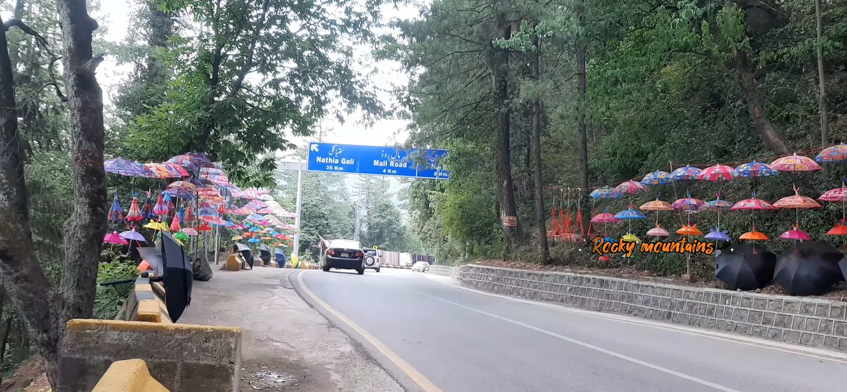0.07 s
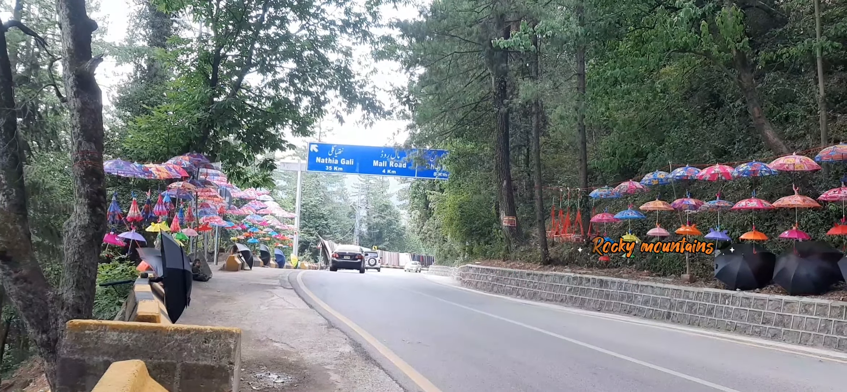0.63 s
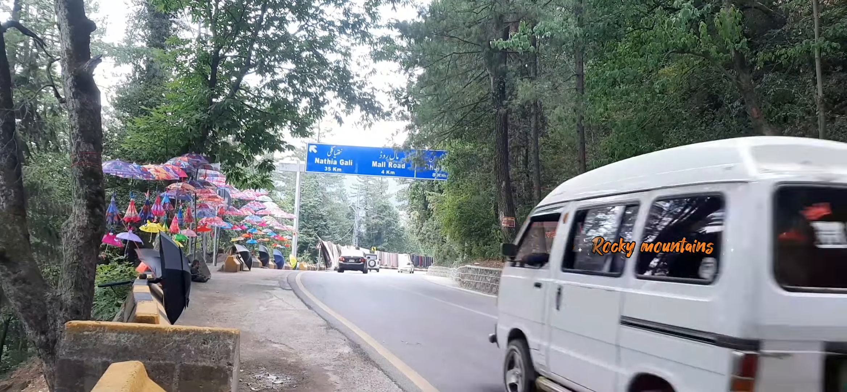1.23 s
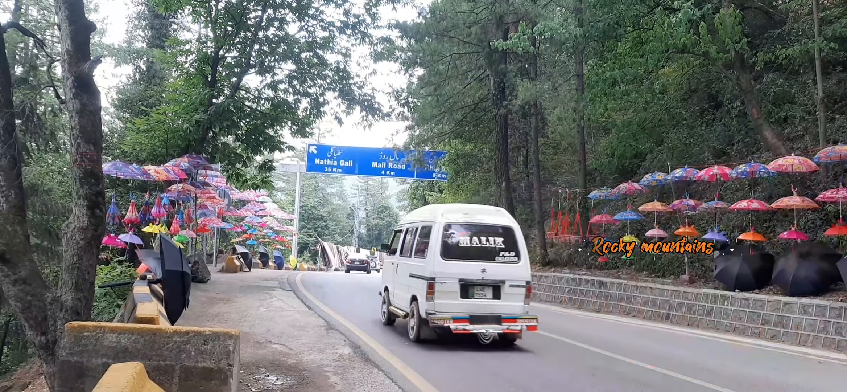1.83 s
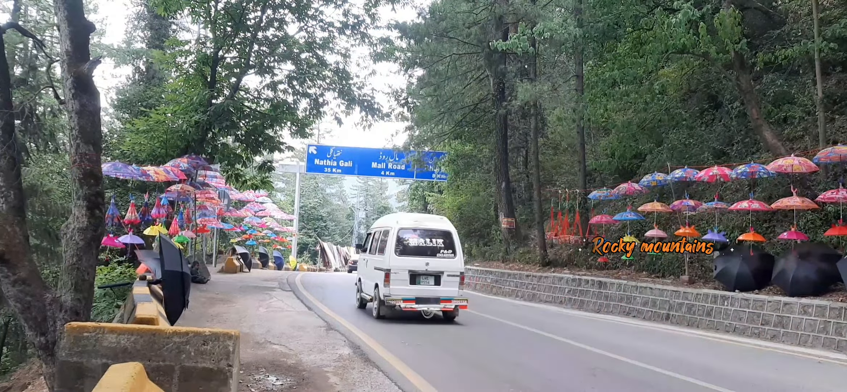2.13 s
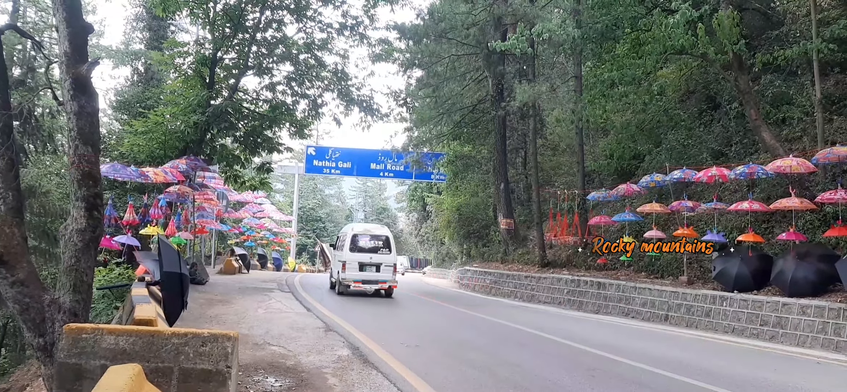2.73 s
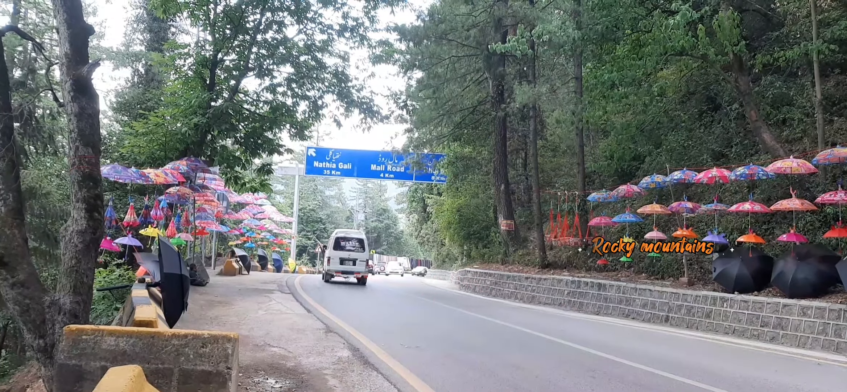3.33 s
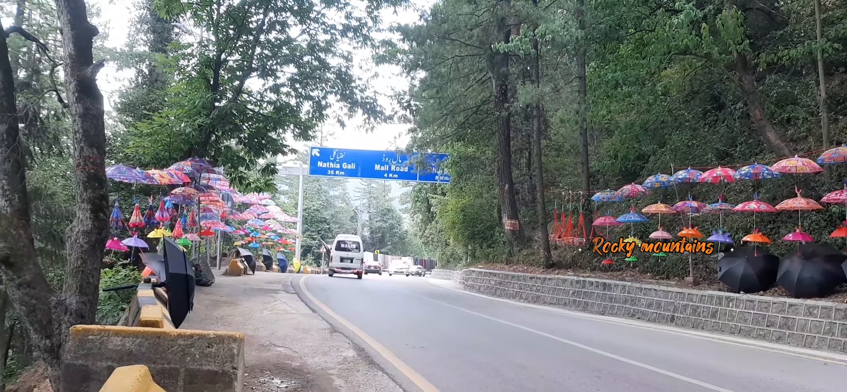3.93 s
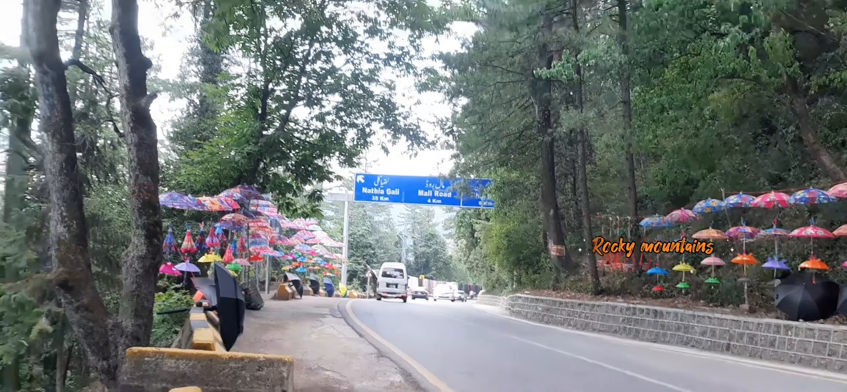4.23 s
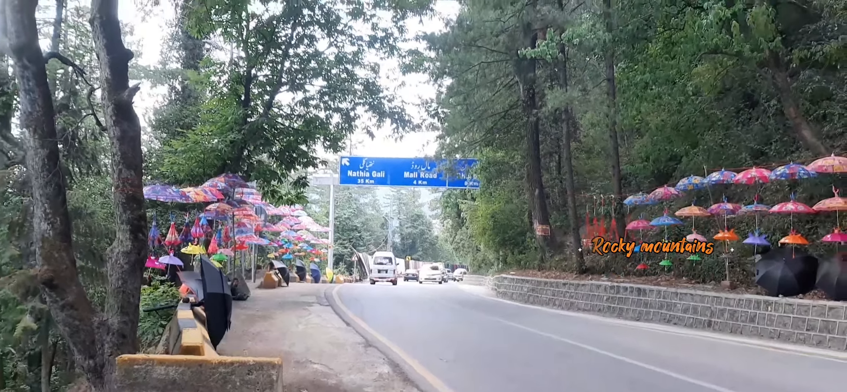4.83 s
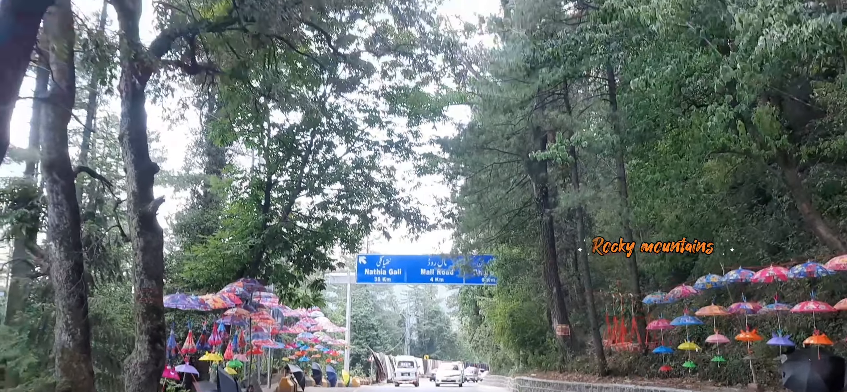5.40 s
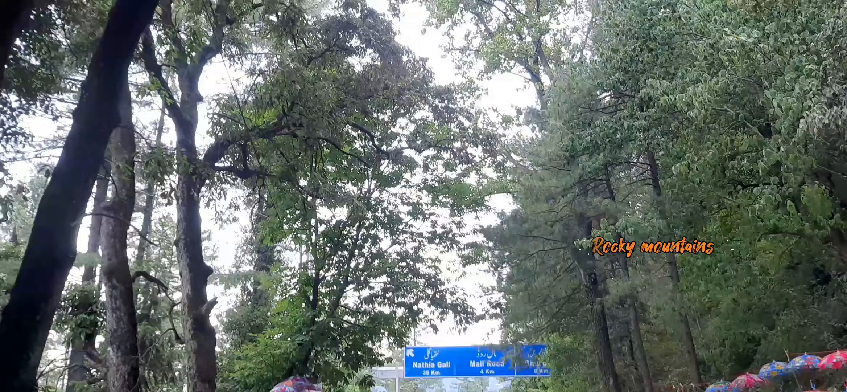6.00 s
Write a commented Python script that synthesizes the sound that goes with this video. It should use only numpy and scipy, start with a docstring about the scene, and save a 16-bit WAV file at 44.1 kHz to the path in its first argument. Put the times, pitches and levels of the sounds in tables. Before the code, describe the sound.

Tyre rush and a humming engine swell quickly as a van drives past a few metres from the microphone, heard a little more on the left. The hiss dies away first, while the low exhaust drone lingers as the van recedes. Far-off traffic murmurs steadily among the trees, birds give short, quiet calls, and there is one brief rustle of handling late on.

```python
"""Van passing on a forest road

A small van drives by about three metres from a camera's stereo microphone and pulls away uphill,
slowly gaining revs. Its exhaust hums, its engine clatters once per firing and its tyres rush.
Traffic murmurs far up the road, birds call in the trees, and a hand rustles briefly on the camera."""
import sys
import numpy as np
from scipy import signal
from scipy.fft import rfft, irfft, next_fast_len
from scipy.io import wavfile
from scipy.ndimage import uniform_filter1d, map_coordinates

SR = 44100
rng = np.random.default_rng(int(sys.argv[2]) if len(sys.argv) > 2 else 0)


def dump(signal):
    """Clip the signal to [-1, 1] and save it as 16-bit WAV at the path in sys.argv[1]."""
    limited = np.clip(np.atleast_2d(signal).T, -1, 1)
    pcm = np.round(limited * 32767).astype(np.int16)
    wavfile.write(sys.argv[1], SR, pcm)


N = 267334
TIME_S = np.arange(N) / SR


def amp(db):
    """Decibels to gain."""
    return 10 ** (np.asarray(db) / 20)


def unit(x):
    """Scale to rms 1."""
    return x / np.sqrt(np.mean(x ** 2) + 1e-20)


def along(points, hz):
    """Read (frequency, value) points at hz, on a log axis."""
    knots_hz, values = np.transpose(points)
    return np.interp(np.log(hz + 1), np.log(knots_hz + 1), values)


def curves(rows):
    """One value per sample for each column after the time."""
    knots_s, *columns = np.transpose(rows)
    return [np.interp(TIME_S, knots_s, column) for column in columns]


def wobble(rate):
    """A smooth random curve, rate knots a second."""
    return map_coordinates(rng.standard_normal(int(N * rate / SR) + 4), [TIME_S * rate])


def step(middle_s, length_s):
    """A smooth rise from 0 to 1."""
    return (1 + np.tanh((TIME_S - middle_s) / length_s / 2)) / 2


def bell(middle_s, half_length_s):
    """A smooth swell from 0 to 1 and back."""
    return np.exp(-((TIME_S - middle_s) / half_length_s) ** 2)


def filtered(x, response):
    """Filter x by a gain given as a function of frequency."""
    size = next_fast_len(N + 8192)
    return irfft(rfft(x, size) * response(np.fft.rfftfreq(size, 1 / SR)), size)[..., :N]


# Balance of the microphone's two ports: frequency_hz, left_minus_right_db
PORT_BALANCE = [(60, 4.5), (160, 3), (300, -1), (450, 3.5), (950, 3), (1400, 6), (1850, 10), (2150, 5),
                (2450, 10.5), (3200, 0), (3800, 9), (4700, 0.5), (6200, 5), (12000, 2)]
# Phase between the ports: frequency_hz, left_lag_rad
PORT_LAG = [(40, .75), (120, 0.62), (200, 0.36), (300, 0.15), (400, 0.17)]

def ports(hz):
    """Left and right response of the microphone, with mean 1."""
    ratio = amp(along(PORT_BALANCE, hz)) * np.exp(-1j * along(PORT_LAG, hz))
    return 2 * np.array([ratio, np.ones_like(ratio)]) / (1 + ratio)


# How alike noise is at the two ports: frequency_hz, correlation
PORT_LIKENESS = [(60, 0.8), (300, 0.8), (420, 0.86), (640, 0.67), (1000, 0.5), (1350, 0.37), (1900, -.5),
                 (2500, 0.18), (15000, 0)]

def rush(spectrum, patchy_db):
    """Stereo noise shaped by a spectrum, with patches of random gain; its mid has rms 1."""
    cells = signal.stft(rng.standard_normal((2, N)), nperseg=512)[2]
    patches = uniform_filter1d(rng.standard_normal(cells.shape[1:]), 5, axis=0)
    patches = unit(uniform_filter1d(patches, 16, axis=1))
    pair = signal.istft(cells * amp(patchy_db * patches), nperseg=512)[1][:, :N]
    size = next_fast_len(N + 8192)
    hz = np.fft.rfftfreq(size, 1 / SR)
    mid, side = rfft(pair, size) * amp(along(spectrum, hz))
    likeness = np.clip(along(PORT_LIKENESS, hz), -.8, 1)
    width = np.tan(np.arccos(likeness) / 2)  # unlike ports give more side
    gain = ports(hz)
    gain = gain / np.hypot(1, width * np.abs(gain[0] - 1))
    stereo = irfft(gain * np.array([mid + width * side, mid - width * side]), size)[:, :N]
    return stereo / stereo.mean(0).std()


# Colour of the traffic far up the road: frequency_hz, density_db
TRAFFIC_SPECTRUM = [(30, -40), (60, -12), (100, 7), (150, -3.5), (200, -6), (375, 0), (440, -9.5),
                    (520, -8.5), (660, -11.5), (880, -12.5), (1100, -14.5), (1300, -12.5), (3000, -22.5),
                    (4100, -19.5), (7400, -34.5), (8500, -55.5)]
# Its level at the microphone: time_s, level_db
TRAFFIC_LEVEL = [(0, -51.5), (3.9, -52), (4.5, -51.5), (5.3, -51), (6.06, -54.5)]

def traffic():
    """Distant cars merge into a nearly steady murmur."""
    level_db = curves(TRAFFIC_LEVEL)[0] + 0.13 * wobble(2.8)
    return amp(level_db) * rush(TRAFFIC_SPECTRUM, patchy_db=1.0)


# Notes from the trees: start_s, length_s, start_hz, end_hz, level_db, overtone_db, hoarseness (0-1)
BIRD_NOTES = [(2.668, 0.037, 3158, 3105, -58, -14, 0.13), (2.735, 0.054, 2580, 2693, -49.5, -8, 0.17),
              (2.888, 0.038, 3900, 3600, -61, -22, 0.09), (2.943, 0.046, 3460, 3170, -64, -20, .1),
              (3.065, .055, 3000, 3430, -51.5, -7.5, 0.81), (3.154, .05, 2550, 2796, -50.5, -7, .8),
              (3.297, 0.061, 2470, 2620, -53, -9.5, 0.3), (3.461, 0.052, 2693, 2405, -50.5, -10.5, 0.31),
              (4.121, .06, 4200, 4310, -61.5, -25, .16), (4.422, .04, 4360, 4214, -60.5, -27, .17),
              (4.607, .05, 4700, 4800, -61.5, -39, 0.14), (5.007, .055, 3835, 3648, -59, -18, 0.2),
              (5.056, 0.047, 3698, 3210, -54, -11, 0.1)]

def birds(rasp_hz, buzz_hz, ragged):
    """Short gliding notes; a fast, ragged buzz splits hoarse ones into side lines."""
    song = np.zeros(N)
    for start_s, length_s, start_hz, end_hz, level_db, overtone_db, hoarseness in BIRD_NOTES:
        on = (TIME_S > start_s) & (TIME_S < start_s + length_s)
        progress = (TIME_S[on] - start_s) / length_s
        jitter = unit(uniform_filter1d(rng.standard_normal(len(progress)), size=40))
        buzz = np.sin(2 * np.pi * buzz_hz * TIME_S[on]) + ragged * jitter
        pitch_hz = start_hz + (end_hz - start_hz) * progress + rasp_hz * hoarseness * buzz
        phase = 2 * np.pi * np.cumsum(pitch_hz) / SR
        envelope = amp(level_db) * np.sqrt(2 * np.abs(np.sin(np.pi * progress)))
        song[on] += envelope * (np.sin(phase) + amp(overtone_db) * np.sin(2 * phase))
    return filtered(song, lambda hz: 1 / (1 + (hz / 7000) ** 16))  # distance dulls the top


# Reverberation of the forest around the microphone: frequency_hz, t60_s
FOREST_DECAY = [(200, 0.61), (3000, 0.91), (10000, 0.75)]

def forest(x):
    """Trunks scatter a sound into a soft tail, different at each port."""
    hz, age_s, cells = signal.stft(rng.standard_normal((2, SR // 2)), SR, nperseg=256)
    decay = amp(-60 * age_s / along(FOREST_DECAY, hz)[:, None])
    tail = signal.istft(cells * decay, SR, nperseg=256)[1]
    return signal.fftconvolve(x[None], tail / np.linalg.norm(tail[0]), axes=1)[:, :N]


# Rubs on the case, right at the microphone: middle_s, level_db, half_length_s
HAND_RUBS = [(4.155, -57.5, .035), (4.206, -51, .015), (4.242, -50.5, 0.016), (4.3, -54, .012),
             (4.326, -53.5, .014), (4.35, -56, .012), (4.41, -58.5, 0.038), (4.472, -57, .007)]
# Colour of the rubbing skin: frequency_hz, density_db
SKIN_SPECTRUM = [(200, -15.5), (500, -1), (1200, 4), (2400, 2), (3100, -4.5), (4100, 2.5), (5200, -6.5),
                 (7000, -5.5), (8700, -25), (13000, -16.5), (15800, -16.5)]

def hand(grain_db, bump_db, bump_hz):
    """Skin slips over the camera's case in short grainy rubs, with one soft bump of the grip."""
    power = sum(amp(level_db) ** 2 / (1 + ((TIME_S - middle_s) / half_length_s) ** 2) ** 2
                for middle_s, level_db, half_length_s in HAND_RUBS)
    grain = unit(amp(grain_db * wobble(700)))
    bump = amp(bump_db) * bell(4.32, 0.056) * np.sin(2 * np.pi * bump_hz * TIME_S)
    return np.sqrt(power) * grain * rush(SKIN_SPECTRUM, patchy_db=2.1) + bump


SPEED_M_PER_S, CLOSEST_M = 6.42, 2.93  # the van's straight path past the microphone
TAIL_TURN_S, TAIL_RISE_S = 0.92, 0.08  # when and how fast its tail comes to face the microphone

def passing(abreast_s, db, ahead_db, behind_db):
    """Level of a part of the van, losing ahead_db or behind_db with each doubling of distance."""
    road_m = SPEED_M_PER_S * (TIME_S - abreast_s)
    doublings = np.log2(np.hypot(1, road_m / CLOSEST_M))
    sag_db = 2.5 * bell(2.22, 0.44)  # the level dips briefly as the van draws away
    return db - np.where(road_m < 0, ahead_db, behind_db) * doublings - sag_db


# Engine speed as heard from the roadside, Doppler drop included: time_s, firing_hz
FIRING_RATE = [(0, 57.67), (.2, 58.48), (.75, 58.41), (1.05, 57.43), (1.35, 56.94), (1.65, 57.47),
               (2.8, 59.5), (3.2, 59.59), (4.45, 60.48), (6.06, 62.55)]

def crank(jitter):
    """Count of the engine's firings so far, with a slight unsteadiness."""
    return np.cumsum(curves(FIRING_RATE)[0]) / SR + jitter * wobble(22)


def order(firings, multiple, db, flutter_db):
    """One line of the exhaust note, at a multiple of the firing rate, as both ports hear it."""
    line = np.exp(2j * np.pi * (multiple * firings + rng.random()))
    mean_hz = multiple * np.mean(FIRING_RATE, axis=0)[1:]
    return np.sqrt(2) * amp(db + flutter_db * wobble(16)) * (ports(mean_hz) * line).real


def bursts(firings, depth, sharp, scatter_db):
    """A gain of rms about 1 that peaks at each firing, each with its own strength; depth is 0-1."""
    strengths = amp(scatter_db * rng.uniform(-np.sqrt(3), np.sqrt(3), 1000))
    nearest = np.floor(firings + .5).astype(int) % 1000
    peaks = unit(strengths[nearest] * np.exp(sharp * (np.cos(2 * np.pi * firings) - 1)))
    return np.sqrt(1 - depth + depth * peaks ** 2)


# Narrow hisses while the van is near the microphone:
# middle_s, half_length_s, pitch_hz, width_hz, level_db, left_minus_right_db
HISS_FLARES = [(.3, 0.66, 3910, 903, -50.5, 14.5), (.58, 0.073, 6350, 904, -44, 12.5),
               (.81, 0.13, 3910, 1201, -40.3, 13), (.84, .13, 1904, 450.4, -44, 15),
               (1.05, 0.044, 6250, 696, -49, 3), (1.22, 0.21, 3330, 700, -51, 7),
               (1.312, 0.087, 5950, 649.5, -48, 3), (1.65, .1, 3510, 702, -52, -1),
               (1.777, 0.18, 5334, 796.3, -50.5, 1)]

def flares(firings, sink_per_s):
    """Fuzzy lines of hiss that swell, pulse with the engine and sink in pitch."""
    hiss = np.zeros((2, N))
    for middle_s, half_length_s, pitch_hz, width_hz, level_db, left_db in HISS_FLARES:
        phase = 2 * np.pi * np.cumsum(pitch_hz * np.exp(-sink_per_s * (TIME_S - middle_s))) / SR
        band = np.array([wobble(width_hz) * np.cos(phase) + wobble(width_hz) * np.sin(phase)
                         for _ in range(2)])
        pan = amp([[left_db / 2], [-left_db / 2]])
        hiss += amp(level_db) * pan * bell(middle_s, half_length_s) * band
    return hiss * bursts(firings, depth=0.6, sharp=1.2, scatter_db=3.5)


# The van's rush with its nose to the microphone: frequency_hz, density_db
FRONT_SPECTRUM = [(260, -14.5), (450, -1.5), (577, -5), (681, -4.5), (937, -8), (1380, -6), (1610, -8),
                  (1880, -6.5), (2170, -10.5), (2440, -8.5), (3090, -16.5), (3830, -11), (5460, -17),
                  (6360, -16.5), (7600, -25), (9880, -66), (16700, -120)]
# The rush heard from behind: frequency_hz, density_db
TAIL_SPECTRUM = [(260, -38), (450, 1), (495, -18.5), (705, -7.5), (852, -16.5), (1100, -14), (1380, -7.5),
                 (1560, -14), (1950, -11), (2140, -16.5), (2380, -8.5), (3020, -17.5), (3440, -14),
                 (4110, -16), (6000, -14), (7600, -23), (9880, -76), (16700, -120)]
# The highest hiss, which carries only a short way: frequency_hz, density_db
HISS_SPECTRUM = [(6000, -44.5), (8500, -8.5), (10000, -4), (12500, -1.5), (15800, -5.5)]
# Its rise and fall at the roadside: time_s, relative_level_db
HISS_LEVEL = [(0, -72), (.26, -67), (.63, -53.5), (.75, -57), (.97, -57), (1.3, -63), (1.75, -69.5),
              (2.15, -78), (2.8, -82.5), (3.9, -93.5)]

def tyres_and_clatter(firings, clatter_depth):
    """Tyres roar smoothly, changing colour as the van goes by; above them each firing ticks."""
    behind = step(TAIL_TURN_S, TAIL_RISE_S)
    front = rush(FRONT_SPECTRUM, patchy_db=1.85)
    tail = amp(-3.5) * rush(TAIL_SPECTRUM, patchy_db=1.7)
    level_db = passing(abreast_s=0.9226, db=-34.5, ahead_db=7, behind_db=9.5)
    body = amp(level_db) * (np.sqrt(1 - behind) * front + np.sqrt(behind) * tail)
    hiss = amp(curves(HISS_LEVEL)[0] + 1.7) * rush(HISS_SPECTRUM, patchy_db=2.4)
    roar = filtered(body, lambda hz: 1 / (1 + (hz / 1900) ** 4))
    depth = clatter_depth * step(0.44, .06)  # the clatter comes out as the cab draws level
    return roar + (body - roar + hiss) * bursts(firings, depth, sharp=1.0, scatter_db=3.5)


def throb_db(rate_hz, crest_s, depth):
    """Round crests and sharp dips, as of two close tones beating."""
    phase = 2 * np.pi * rate_hz * (TIME_S - crest_s) + 0.23 * wobble(3)
    return 20 * np.log10(np.abs(1 + depth * np.exp(1j * phase)))


# The exhaust's drone at the roadside: time_s, second_order_relative_db, third_order_relative_db
DRONE_LEVELS = [(0.0, -37, -39), (0.1, -33.5, -42), (0.37, -31, -36), (0.64, -33.5, -48),
                (0.76, -36.5, -37), (0.86, -32.5, -42), (0.99, -28.5, -34.5), (1.43, -29.5, -49),
                (1.67, -31, -40), (2.41, -39, -49.5), (2.65, -37, -44), (3.11, -40.5, -45.5),
                (3.39, -39, -40), (3.66, -38.5, -49.5), (4.15, -41, -44), (4.91, -42, -50),
                (5.67, -42, -48.5), (6.06, -52, -53)]
# Weaker orders against the engine's level, from either end of the van: multiple, front_db, behind_db
UPPER_ORDERS = [(6, -0.5, -4.5), (7, -5, -11.5), (8, -26, -9.5), (9, -8.5, -21), (11, -14, -18),
                (12, -20, -17.5)]
# Lines that unequal cylinders add between the orders, against the tailpipe up close: multiple, level_db
UNEVEN_LINES = [(5 / 3, -10), (10 / 3, -6), (17 / 3, -13.5)]

def exhaust(firings):
    """Firing pulses make clean low orders, wavering upper ones and a puffing rumble."""
    second_db, third_db = curves(DRONE_LEVELS)
    engine_db = passing(abreast_s=0.95, db=-40.5, ahead_db=4.5, behind_db=6.5)
    engine_db += 3.5 * bell(3.8, .75)  # swells as the van pulls uphill
    pipe_db = passing(abreast_s=1.5, db=-39.5, ahead_db=6.5, behind_db=6.5)
    fourth_db = passing(abreast_s=1.0, db=-42, ahead_db=11, behind_db=8)
    fifth_db = passing(abreast_s=1.38, db=-44, ahead_db=3.5, behind_db=4)
    hum = order(firings, 1, pipe_db - .7, flutter_db=.8)
    hum += order(firings, 2, second_db - .3, flutter_db=.6)
    hum += order(firings, 3, third_db - .7, flutter_db=0.97)
    hum += order(firings, 4, fourth_db, flutter_db=2.1)
    hum += order(firings, 5, fifth_db + throb_db(rate_hz=3.21, crest_s=4.08, depth=0.68), flutter_db=0.7)
    behind = step(TAIL_TURN_S, TAIL_RISE_S)
    upper = sum(order(firings, multiple, engine_db + front + (back - front) * behind, flutter_db=2.0)
                for multiple, front, back in UPPER_ORDERS)
    near_db = pipe_db + .7 * (pipe_db - pipe_db.max())  # fades with distance faster than the tailpipe
    uneven = sum(order(firings, multiple, near_db + db, flutter_db=3.0) for multiple, db in UNEVEN_LINES)
    puffs = bursts(firings, depth=.5, sharp=1.3, scatter_db=1.5)
    return hum + upper + uneven + rumble(engine_db + 3.5) * puffs


# Colour of the engine's rumble from the roadside: frequency_hz, density_db
RUMBLE_SPECTRUM = [(25, -41.5), (45, -19.5), (90, 4.5), (150, 1), (215, 2), (330, 0.5), (450, -12),
                   (520, -14.5), (650, -10.5), (900, -27.5), (2000, -66.5)]

def rumble(level_db):
    """The engine's low noise beneath the exhaust note."""
    return amp(level_db) * rush(RUMBLE_SPECTRUM, patchy_db=1.3)


def scene():
    """From the roadside: the van close by, the far road, birds a little to the left, and the hand."""
    firings = crank(jitter=0.0075)
    van = exhaust(firings) + tyres_and_clatter(firings, clatter_depth=0.27)
    van += flares(firings, sink_per_s=.13)
    song = birds(rasp_hz=1010, buzz_hz=575, ragged=.5)
    background = traffic() + amp([[0], [-2.5]]) * song + amp(-0.2) * forest(song)
    return background + hand(grain_db=3.0, bump_db=-42, bump_hz=98) + van


def record(dry):
    """The sound starts and stops softly; the camera keeps nothing above its band limit."""
    fade_s, top_hz = .008, 15850
    fade = np.minimum(1, np.minimum(TIME_S, TIME_S[::-1]) / fade_s)
    return filtered(dry * fade, lambda hz: hz < top_hz)


dry = scene()
out = record(dry)
dump(out)
```